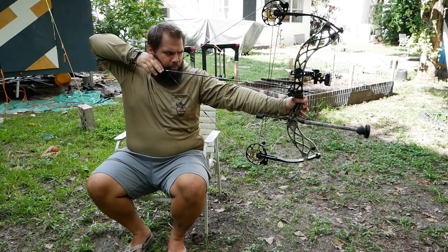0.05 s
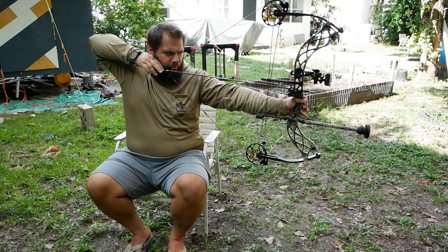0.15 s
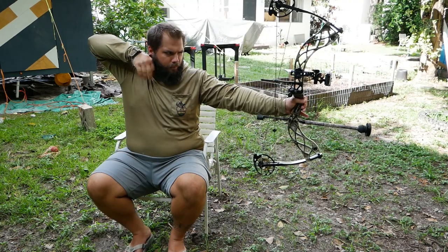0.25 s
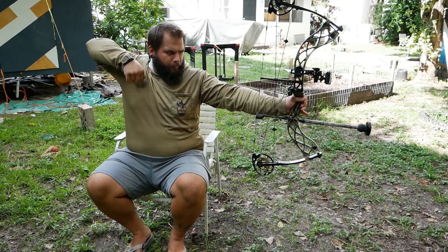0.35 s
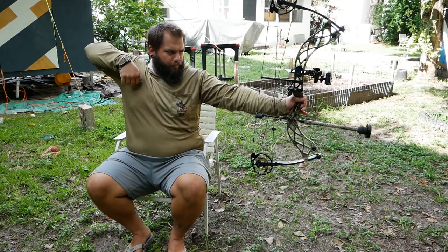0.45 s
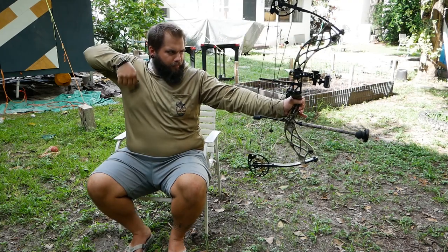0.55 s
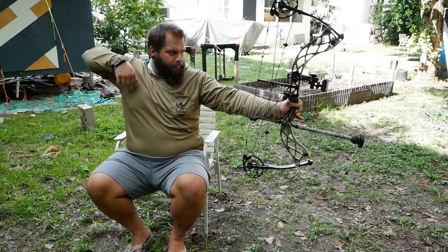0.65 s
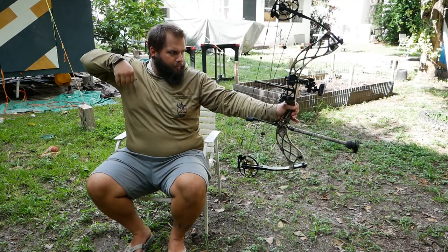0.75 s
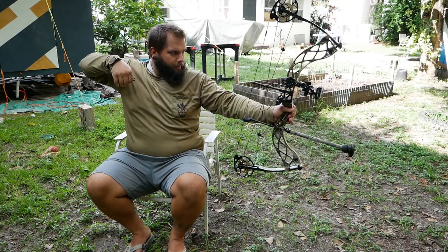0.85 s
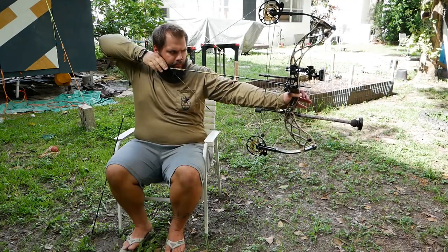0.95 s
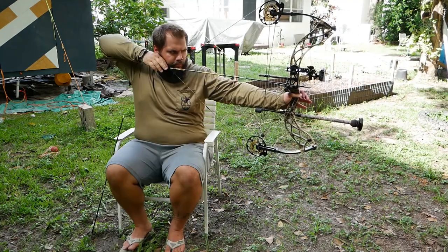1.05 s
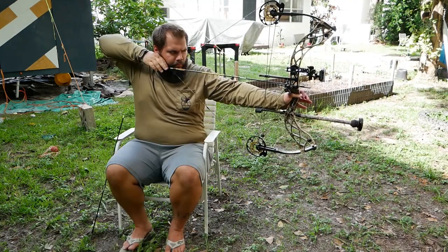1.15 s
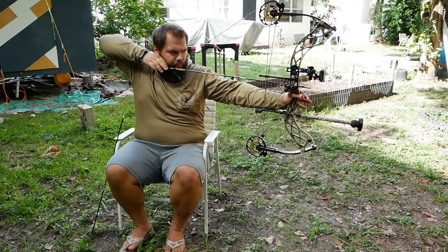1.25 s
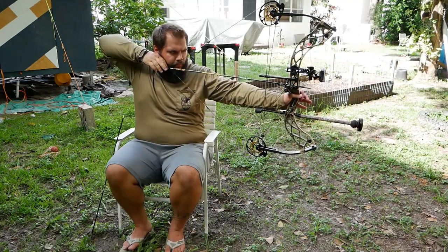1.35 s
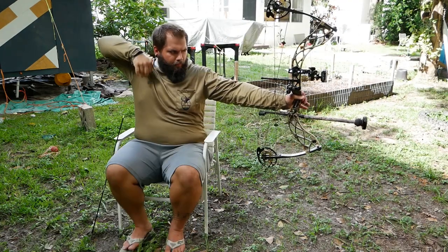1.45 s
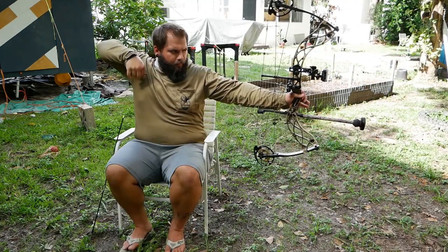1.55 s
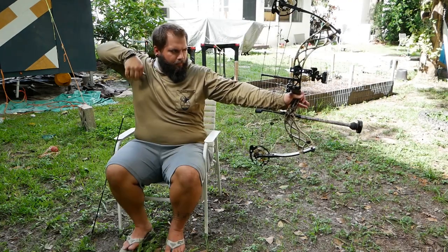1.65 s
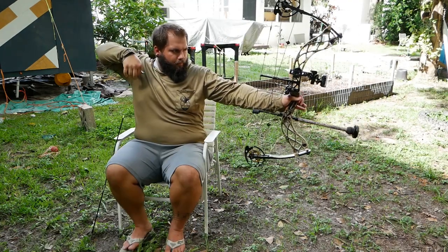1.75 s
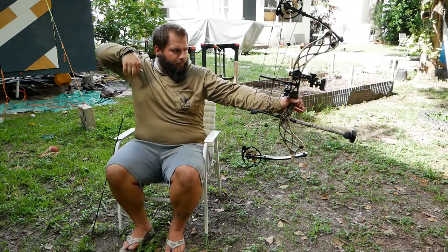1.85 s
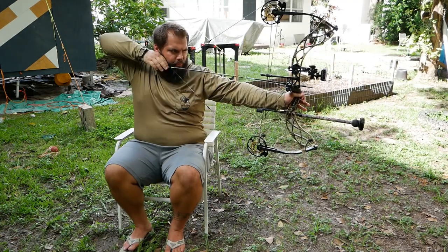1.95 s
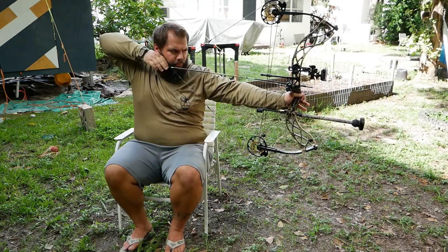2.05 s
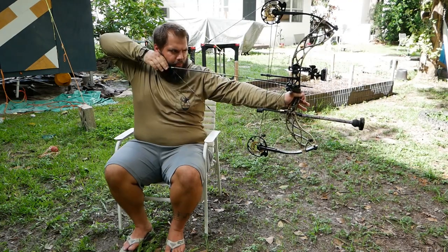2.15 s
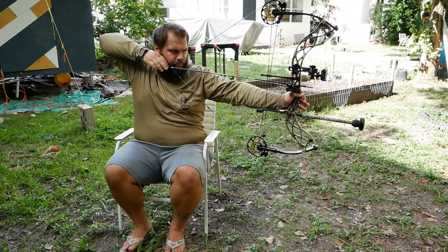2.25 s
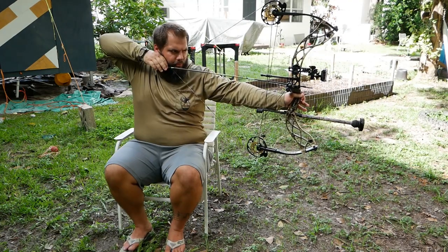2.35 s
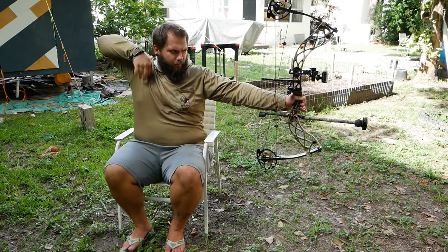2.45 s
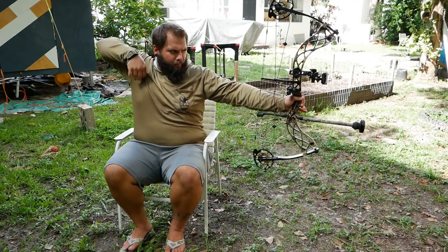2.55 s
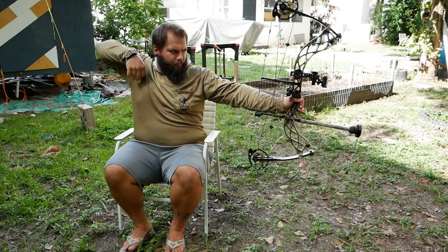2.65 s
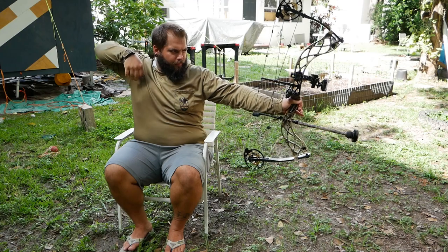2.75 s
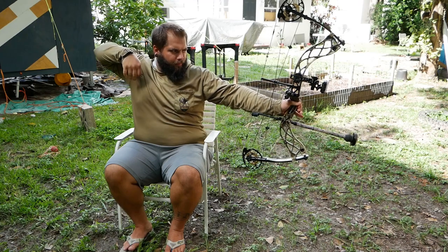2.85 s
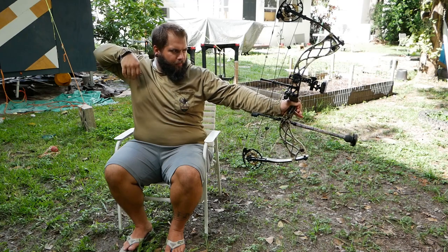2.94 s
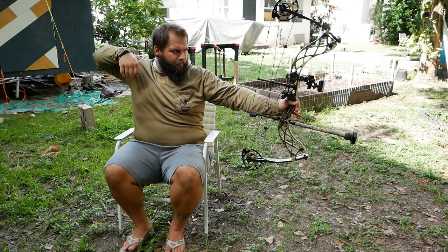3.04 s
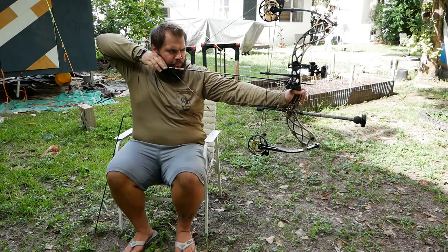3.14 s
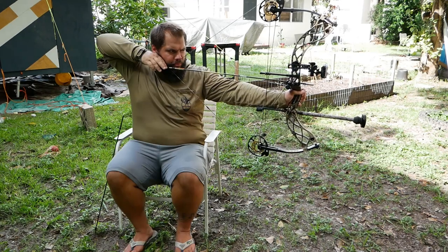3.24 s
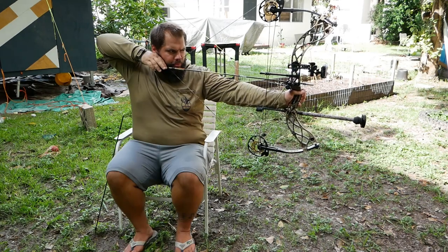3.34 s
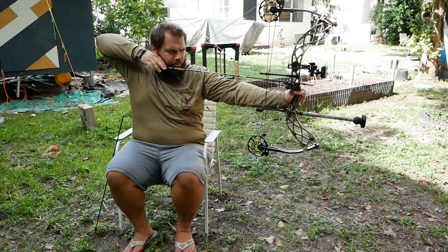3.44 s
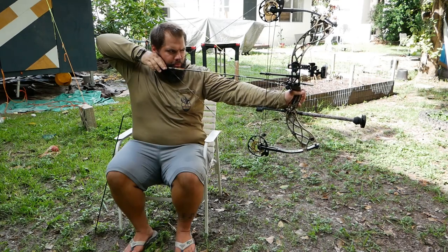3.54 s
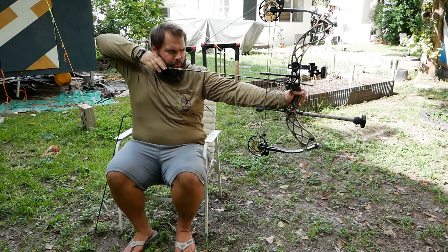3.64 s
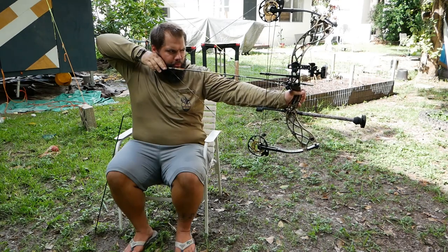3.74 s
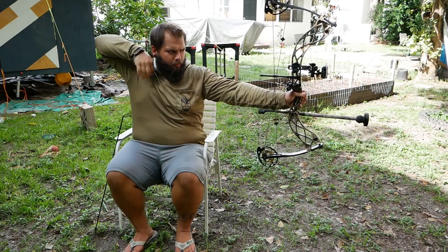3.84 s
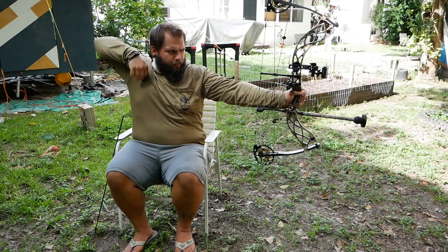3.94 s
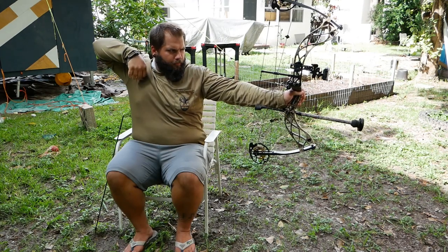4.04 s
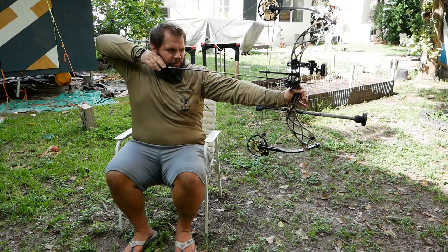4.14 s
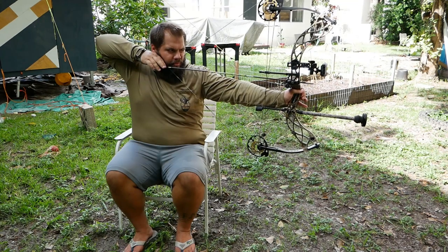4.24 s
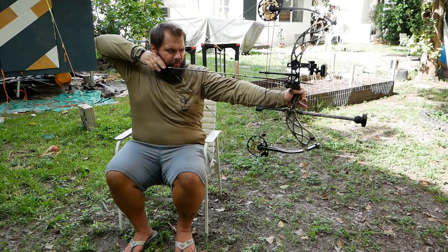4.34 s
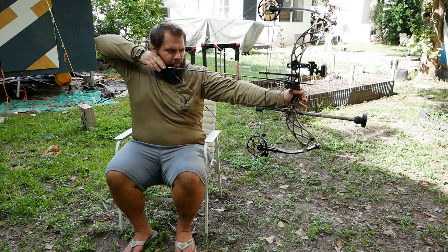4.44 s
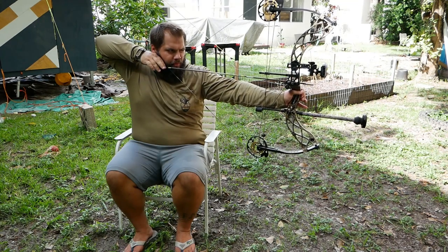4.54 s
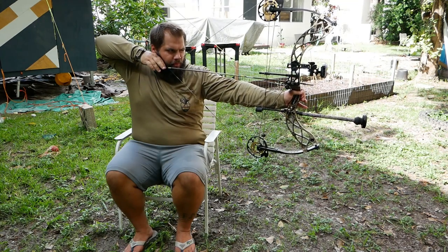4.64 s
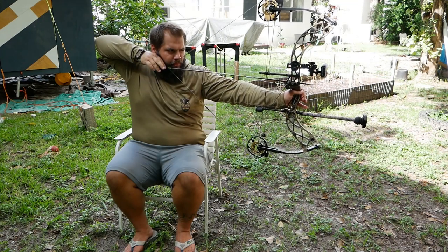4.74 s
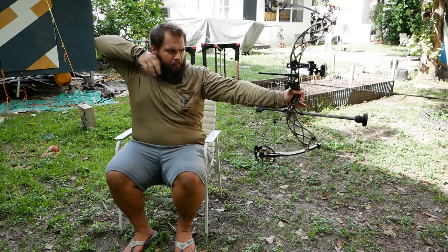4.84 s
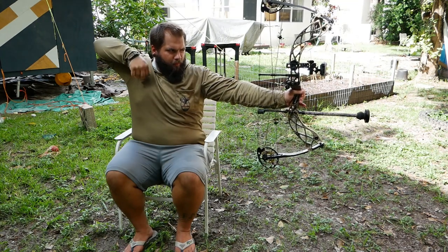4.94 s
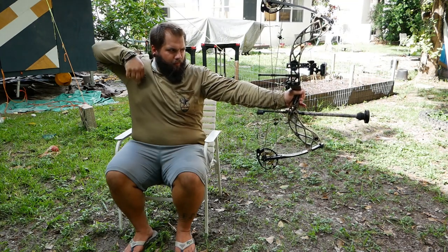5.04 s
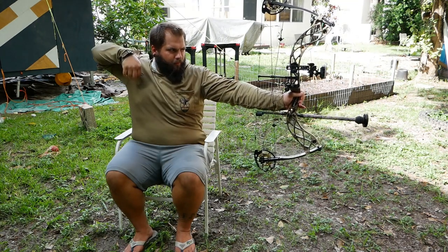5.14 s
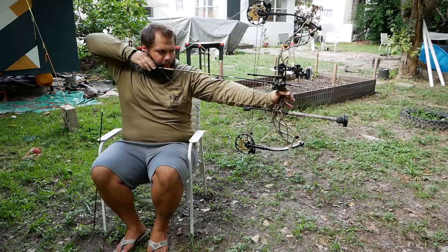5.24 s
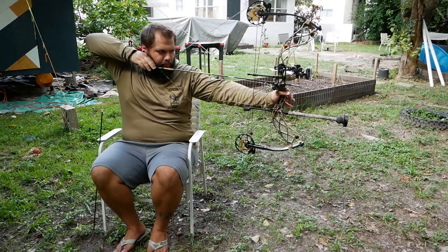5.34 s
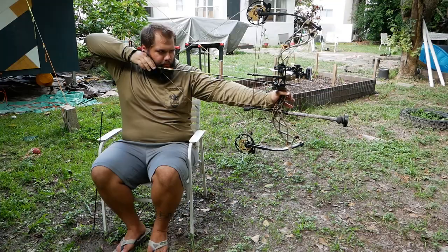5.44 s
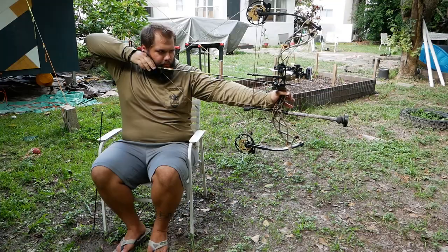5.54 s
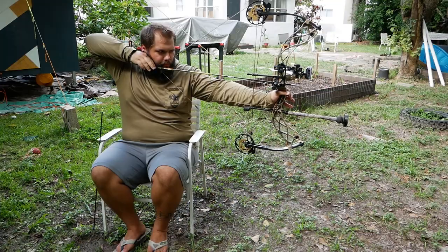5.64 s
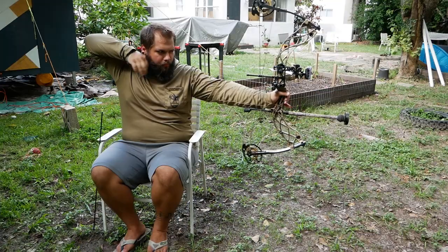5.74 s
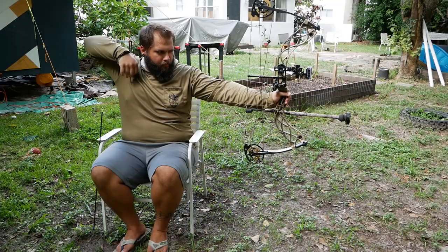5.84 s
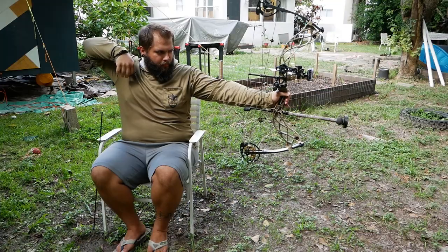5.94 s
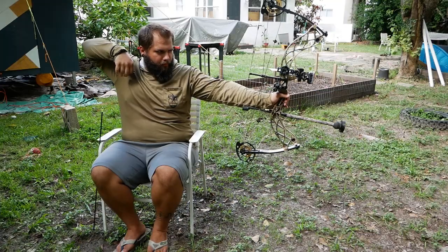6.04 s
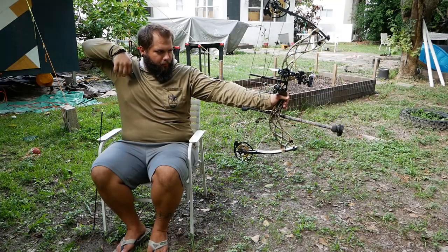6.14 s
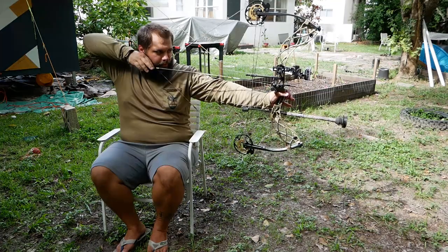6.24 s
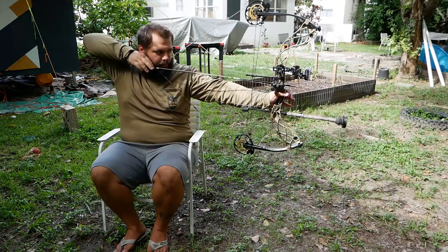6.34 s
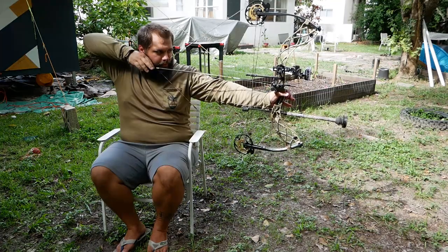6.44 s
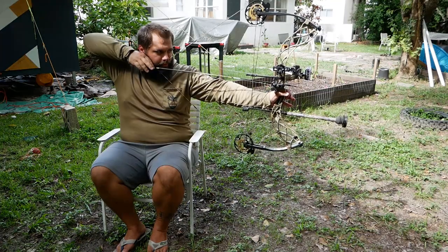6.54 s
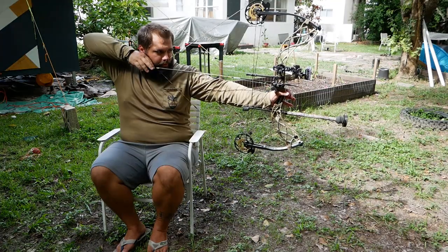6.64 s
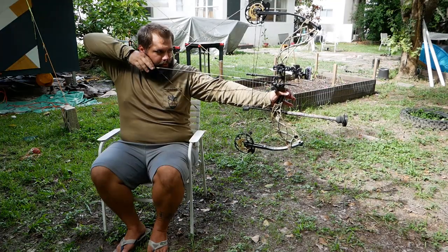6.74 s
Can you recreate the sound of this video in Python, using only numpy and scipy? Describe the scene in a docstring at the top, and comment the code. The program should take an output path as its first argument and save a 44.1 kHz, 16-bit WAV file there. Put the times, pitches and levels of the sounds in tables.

```python
"""A yard with a distant town humming: six shots of a compound bow, cut together back to back.
Each release ticks, the string tears the air with a rising whistle and the limbs buzz (noise and sines).
The arrow pops through a paper sheet and thuds into a target on the right (short pulses, then a ring).
Walls and yard throw it back as delayed copies and sparse random echoes. Thin tones whine at times, a far
dog barks on the left (resonances) and the grass ticks once. Levels in dB are relative parts of the mix."""
import sys
import numpy as np
from scipy import signal
from scipy.fft import rfft, irfft, next_fast_len
from scipy.io import wavfile
from scipy.ndimage import uniform_filter1d

SR = 44100
rng = np.random.default_rng(int(sys.argv[2]) if len(sys.argv) > 2 else 0)


def generate_wav(signal):
    """Clip the signal to [-1, 1] and save it as 16-bit WAV at the path in sys.argv[1]."""
    frames = np.transpose(np.atleast_2d(signal))
    scaled = np.clip(frames, -1, 1) * 32767
    pcm = np.round(scaled).astype(np.int16)
    wavfile.write(sys.argv[1], SR, pcm)


N = 299439  # length in samples

# the stretches between cuts: start t/s, hum level/dB, brightness/dB per octave
STRETCHES = [(0, -56, 0.87), (1.004, -49.5, 0.68), (1.973, -53, 1.13), (3.131, -58, 0.88),
             (4.176, -59.5, 0.9), (5.232, -55.5, 0.84), (6.23, -55, 0.7)]


def gain_of(db):
    """Turns decibels into a plain multiplier."""
    return 10 ** (np.asarray(db) / 20)


def evened(x):
    """Scales a signal to an average strength (rms) of 1."""
    return x / np.sqrt(np.mean(x ** 2) + 1e-20)


def read(points, hz):
    """Reads a table of (f/Hz, value) between its points, along a logarithmic pitch axis."""
    f, value = np.transpose(points)
    return np.interp(np.log(hz + 1), np.log(f + 1), value)


def colour(x, response):
    """Makes each frequency stronger or weaker: multiplies the spectrum by response(hz)."""
    size = next_fast_len(x.shape[-1] + 512)
    spectrum = rfft(x, size) * response(np.fft.rfftfreq(size, 1 / SR))
    return irfft(spectrum, size)[..., :x.shape[-1]]


def resonate(x, hz, width):
    """A resonance of gain 1: shifts the pitch hz (fixed or gliding) to zero, smooths, and shifts back."""
    turn = np.exp(2j * np.pi * np.cumsum(hz * np.ones(len(x))) / SR)
    keep = np.exp(-np.pi * width / SR)
    smooth = signal.lfilter([1 - keep], [1, -keep], x / turn)
    return 2 * (turn * smooth).real


def narrow(x, hz, width):
    """Noise through the same resonance twice, which leaves a steep peak."""
    return evened(resonate(resonate(x, hz, width), hz, width))


def shape(t, db, start, end, rise, fall):
    """Level in dB: rises at rise dB/s, holds at db from start to end, falls at fall dB/s."""
    return db - rise * np.maximum(start - t, 0) - fall * np.maximum(t - end, 0)


def wander(size, seconds):
    """Slow random drift of rms 1: noise averaged twice over the given time."""
    width = max(round(seconds * SR), 2)
    once = uniform_filter1d(rng.standard_normal(size), width)
    return evened(uniform_filter1d(once, width))


def hum():
    """Distant town: random short-time spectra with drifting patches; level and brightness jump at each cut."""
    # average colour of the hum: f/Hz, level/dB
    hum_colour = [(25, -4.5), (60, -4), (100, 5), (160, 1.5), (240, -2), (350, -3.5), (480, -4.5),
                  (1200, -10.5), (1500, -14.5), (2500, -24.5), (6000, -41), (10000, -44.5), (13000, -52.5)]
    # how alike left and right are: f/Hz, likeness (0 to 1)
    likeness = [(60, 0.67), (170, 0.88), (500, 0.22), (1420, 0.13), (4080, 0.55), (11700, 1)]
    # left minus right: f/Hz, level/dB
    lean = [(60, -4), (170, 0.5), (500, -2), (1420, -2.5), (4080, -0.5), (11700, -1)]
    hop = 128  # samples between spectra
    frames, hz = N // hop + 5, np.fft.rfftfreq(512, 1 / SR)
    a, b, c, d, patches = rng.standard_normal((frames, 257, 5)).T
    patches = uniform_filter1d(patches, 5, 0)  # smooth across frequency
    patches = evened(uniform_filter1d(patches, 24, 1))  # and across time
    start, level_db, bright_db = np.transpose(STRETCHES)

    def stretch_at(t):
        return np.clip(np.searchsorted(start, t, "right") - 1, 0, None)

    same = np.clip(read(likeness, hz), -1, 1)[:, None]
    left = a + 1j * b
    right = same * left + np.sqrt(1 - same ** 2) * (c + 1j * d)
    octaves = np.log2(hz[:, None] / 500 + .05)
    tilt_db = octaves * bright_db[stretch_at(np.arange(frames) * hop / SR)]
    spectra = np.array([left, right])
    spectra *= gain_of(read(hum_colour, hz)[:, None] + tilt_db + 0.84 * patches)
    spectra *= gain_of(np.multiply.outer([.5, -.5], read(lean, hz)))[:, :, None]
    x = evened(signal.istft(spectra, nperseg=512, noverlap=512 - hop)[1][:, :N])
    return x * gain_of(level_db[stretch_at(np.arange(N) / SR)])


def bow(tick_db, bow_db, t):
    """Release tick, rush and rising whistle of the string, then buzzing limbs and cables; t counts from release."""
    # limb and cable resonances: f/Hz, width/Hz (unused by the first two), level/dB
    # the first two are sines whose pitch varies a little at random, the others are resonant noise
    limbs = [(244.5, 40, -10.5), (416, 20, -2), (580, 240, -4), (1210, 420, -12.5), (1910, 360, -16.5),
             (2795, 370, -23)]
    # colour of the torn air: f/Hz, level/dB
    air_colour = [(200, -11), (800, 4.5), (2000, 6.5), (4000, -5), (6500, -12.5), (10000, -8.5),
                  (13000, -31)]
    stop_s, run_s = .0215, .12  # the string slams home; rush and upper buzz end
    a, b, c, d = rng.standard_normal((4, len(t)))
    detune = 1 + .04 * rng.uniform(-1, 1, 2)

    # the tick is bright noise that drops 60 dB in 0.03 s
    tick = gain_of(tick_db + 1.5 - 60 * t / 0.03) * evened(colour(a, lambda f: f / (f + 4000)))

    # air torn by the string, and by the arrow, loudest at the paper
    whip_db = shape(t, db=-14, start=.015, end=.05, rise=2000, fall=900)
    flight_db = shape(t, db=-8, start=.04, end=.052, rise=600, fall=500)
    onset_db = 2000 * np.minimum(t - .015, 0)  # the flight may not start ahead of the whip
    torn_db = np.maximum(whip_db, np.minimum(flight_db, onset_db))
    air = gain_of(torn_db) * evened(colour(b, lambda f: gain_of(read(air_colour, f))))

    # the whistle glides up with the string's speed
    whistle_hz = 1500 + (4200 - 1500) * np.minimum(t / stop_s, 1) ** 3.0
    whistle_db = shape(t, db=-4, start=.017, end=.0225, rise=4500, fall=9000)
    whistle = gain_of(whistle_db) * evened(resonate(c, whistle_hz, 470))

    def buzz_shape(time):
        return shape(time, db=1.5, start=.0245, end=.042, rise=9000, fall=3000)

    buzz_db = buzz_shape(t)
    # the lowest limb mode is already moving 4 ms earlier
    lowest_db = np.maximum(buzz_db, buzz_shape(t + .004))
    low = 0
    for (f, _, db), factor, level_db in zip(limbs, detune, (lowest_db, buzz_db)):
        sine = np.sin(2 * np.pi * f * factor * (t - stop_s - .001))
        low = low + gain_of(db + level_db) * np.sqrt(2) * sine
    high = sum(gain_of(db) * evened(resonate(d, f, width)) for f, width, db in limbs[2:])
    rush = tick + gain_of(bow_db) * (air + whistle + gain_of(buzz_db) * high) * (t < run_s)
    return rush, gain_of(bow_db) * low


def blow(pop, modes, u, deep_db):
    """A hit in both ears: a pop of air made of short pulses, then fading sines; u is the time since contact."""
    # below 3 kHz the left wave runs a little ahead: sideways sound reaches the two ports a little apart
    lead = np.array([[.00007], [0]])
    # pitch and half length share one random factor, so a pulse drawn higher is also longer
    pulses = pop * rng.uniform(0.88, 1.217, (len(pop), 1)) ** [1, 1, 0, 0]
    burst = 0
    for hz, half, left_db, right_db in pulses:
        bump = np.exp(-(u / half - 1) ** 2)  # peaks one half length after contact, so short ones peak first
        wave = np.cos(2 * np.pi * hz * (u - half + lead * (hz < 3000)))
        burst = burst + gain_of([[left_db], [right_db]]) * bump * wave

    u = np.maximum(u, 0)
    ring = 0
    for hz, t60, left_db, right_db in modes * rng.uniform(.94, 1.06, (len(modes), 1)) ** [1, 0, 0, 0]:
        level_db = np.array([[left_db], [right_db]]) - 60 * u / t60 + deep_db * (hz < 160)
        ring = ring + gain_of(level_db) * np.sin(2 * np.pi * hz * u)
    return burst + ring * (1 - np.exp(-u / .002))  # the ring swells in over about 2 ms


def bounced(x, late, db):
    """Adds the copy that comes off the ground, late seconds behind."""
    return x + gain_of(db) * np.roll(x, round(late * SR), axis=-1)


def yard():
    """Sparse random echoes, each band dying at its own speed: the yard's return and the house's answer to hits."""
    # time to fade by 60 dB: f/Hz, t/s
    fade_times = [(100, 1), (400, 0.6), (1000, 0.53), (2500, 0.53), (6000, 0.46), (11000, 0.45)]
    # three parts of the return, a row for left and one for right:
    # level/dB, full from t/s, full until t/s, rise/(dB/s), fall/(dB/s)
    near_shapes = [(-7, 0, 0.001, 100, 140), (-9, 0, .001, 100, 95)]
    house_shapes = [(-3, .084, .1, 900, 200), (-13, .066, .08, 600, 150)]
    far_shapes = [(-0.5, .26, .42, 70, 20), (3.0, .29, .42, 70, 40)]
    # colour of fence and grass: f/Hz, level/dB
    near_colour = [(200, 3), (420, -3), (750, -9), (1500, -2), (3000, 2), (8000, 3)]
    # colour of the house's answer: f/Hz, level/dB
    house_colour = [(150, -12), (300, -4), (450, 1.5), (1200, -0.5), (3000, -8), (8000, -9)]
    # one tap in every 20 samples, of random sign; the ears share a little
    at = np.arange(0, SR - 20, 20) + rng.integers(0, 20, (2, (SR - 1) // 20))
    taps = np.zeros((2, SR))
    np.put_along_axis(taps, at, rng.choice([-1., 1.], at.shape), 1)
    taps = taps + 0.21 * taps[::-1]

    hz, frame_t, spectra = signal.stft(taps, SR, nperseg=256)
    fading = spectra * gain_of(-60 * frame_t / read(fade_times, hz)[:, None])
    tail = signal.istft(fading, SR, nperseg=256)[1][:, :SR]
    lumps_db = 1.5 * wander(SR, .01)  # uneven, lumpy echo
    tail = tail * gain_of(lumps_db) / np.sqrt(0.038 * 2000)

    t = np.arange(SR) / SR
    near, house, far = (gain_of([shape(t, *side) for side in part])
                        for part in (near_shapes, house_shapes, far_shapes))
    near_return = colour(tail * near, lambda f: gain_of(read(near_colour, f)))
    house_return = colour(tail * house, lambda f: gain_of(read(house_colour, f)))
    return near_return + tail * far, house_return


def shot(release, paper, target, tail, house):
    """One shot: bow, paper and target heard directly, then off the ground, walls, house and yard."""
    # pulses of each pop, before a random spread: f/Hz, half length t/s, left level/dB, right level/dB
    sheet_pop = [(1300, .0005, -26.5, -5), (2610, .0003, -10, -6.5), (3700, 0.00021, -13.5, -13),
                 (8000, .0002, -29, -26)]
    bag_pop = [(450, .0015, -14, -24), (720, .0007, -21, -2.5), (1400, .0006, -21, -10),
               (2200, .0005, -15, -8), (3600, .0003, -20, -20), (7500, .0002, -33, -34)]
    # what rings on, pitch before a random spread: f/Hz, 60 dB fade t/s, left level/dB, right level/dB
    sheet_modes = [(560, .013, -13, -12), (1600, .008, -22, -16), (2900, .008, -19, -19)]
    bag_modes = [(118, 0.27, -46, -46), (213.2, 0.035, -16, -21), (310, .025, -22, -17),
                 (430, 0.025, -32, -12)]
    # single reflections off things close by: delay t/s, left level/dB, right level/dB
    walls = [(.0037, -26, -24), (.0065, -28, -12), (.0176, -12, -28), (.0285, -17, -30), (.074, -32, -22)]
    t = np.arange(SR // 5) / SR
    release_s, tick_db, bow_db = release
    rush, buzz = bow(tick_db, bow_db, t)
    sheet = gain_of(paper[1]) * blow(sheet_pop, sheet_modes, t - paper[0] + release_s, 0)
    bag = gain_of(target[1]) * blow(bag_pop, bag_modes, t - target[0] + release_s, target[2])
    hits = bounced(sheet, .0014, -2.5) + bounced(bag, .00147, -1)

    into_yard = rush + gain_of(-2.0) * buzz + gain_of(-3.5) * (sheet + bag)[1]
    out = signal.fftconvolve(into_yard[None], tail, axes=1)
    out[:, :len(t)] += (rush + buzz) * gain_of([[-.6], [.6]]) + hits

    def add_late(x, late, left_db, right_db):
        out[:, round(late * SR):][:, :len(t)] += x * gain_of([[left_db], [right_db]])

    # small walls return little bass
    thin = colour((gain_of(-4.0) * sheet + bag)[1], lambda f: f ** 2 / (f ** 2 + 600 ** 2))
    for late, left_db, right_db in walls:
        add_late(thin, late, left_db, right_db)
    # the house front answers in five evenly spaced slaps, each 1.5 dB softer
    for k in range(5):
        add_late(thin, .084 + k * .0064, -17 - 1.5 * k, -33 - 1.5 * k)
    into_house = gain_of(-2.5) * thin + gain_of(5.0) * bag[0]
    out += signal.fftconvolve(into_house[None], house, axes=1)

    # the far wall behind the bow returns a dull copy
    dull = colour(rush + buzz, lambda f: 1 / (1 + (f / 2500) ** 2))
    add_late(dull, .134, -14, -18)
    return out


def rustle():
    """A faint dry tick in the grass: a short puff of noise, brightened by taking sample differences."""
    # ticks: t/s, level/dB (9 dB is taken off below)
    grass_ticks = [(0.8296, -62)]
    out, t = np.zeros((2, N)), np.arange(2000) / SR
    for s, db in grass_ticks:
        bright = np.diff(rng.standard_normal(len(t) + 1))
        out[:, round(s * SR):][:, :len(t)] += gain_of(db - 9 - 60 * t / .06) * bright
    return out


def whine():
    """Thin tones that throb: sines with narrow noise around them, their level drifting at random."""
    # tones: f/Hz, level/dB
    tone_rows = [(1180, -3), (2342, 0)]
    # when they sound: from t/s, to t/s, level/dB
    spells = [(1.004, 1.55, -71), (1.973, 3.131, -73), (3.131, 3.86, -80)]
    t = np.arange(N) / SR
    level = sum(gain_of(db) * (t > start) * (t < end) for start, end, db in spells)
    level = level * gain_of(1.2 * wander(N, .03))
    tones = 0
    for hz, db in tone_rows:
        fuzz = .7 * narrow(rng.standard_normal(N), hz, 30)
        tones = tones + gain_of(db) * (np.sin(2 * np.pi * hz * t) + fuzz)
    return tones * level * gain_of([[-1.5], [2.5]])


def bark():
    """A far dog barks on the left, with a fainter second sound: two low part-steady modes and noisy ones above."""
    # the bark and the fainter second sound: t/s, level/dB
    bark_hits = [(1.232, -42), (1.41, -57)]
    # resonances of the bark: f/Hz, width/Hz, level/dB
    bark_modes = [(537.5, 78, 3), (658, 35, 1), (726, 87, -4.5), (1090, 110, -4), (1240, 150, 1.5),
                  (1400, 250, -9.5), (1600, 100, -5.5)]
    # how modes swell and die around each moment: level/dB, full from t/s, full until t/s, rise and fall/(dB/s)
    first_mode = (1.5, .008, .048, 330, 230)
    second_mode = (4.0, .01, .022, 330, 230)  # the third mode shares it
    upper_modes = (-5.5, -.03, .02, 900, 80)
    first = round((bark_hits[0][0] - .1) * SR)
    t = (first + np.arange(SR // 2)) / SR
    push, out = rng.standard_normal((2, len(t))), np.zeros((2, N))
    for k, (hz, width, db) in enumerate(bark_modes):
        scattered = 0.73 * np.array([narrow(p, hz, width) for p in push])
        steady = (k < 2) * np.sin(2 * np.pi * hz * t)
        part = (first_mode, second_mode, second_mode, upper_modes)[min(k, 3)]
        level = gain_of(db) * sum(gain_of(hit_db + shape(t - s, *part)) for s, hit_db in bark_hits)
        out[:, first:first + len(t)] += level * (scattered + steady)
    return out * gain_of([[2.5], [-5]])


def scene():
    """Lays the six shots over the background; each shot's echoes stop at the next cut."""
    # one row a shot: release t/s, tick level/dB (1.5 dB is added in bow), bow level/dB
    releases = [(0.3039, -40.5, -29.5), (1.4532, -40, -26), (2.4475, -43, -28), (3.8632, -43.5, -30.5),
                (4.905, -44.5, -31), (5.7923, -45.5, -30.5)]
    # arrow through the paper: t/s, level/dB
    paper_hits = [(0.3455, -12), (1.4944, -4), (2.4900, -2.5), (3.9064, -10), (4.9460, -10), (5.835, -5.5)]
    # arrow into the target: t/s, level/dB, extra deep thump level/dB
    target_hits = [(0.3591, -5.5, 0), (1.5075, -4, 7), (2.5041, -4.5, 3), (3.9203, -4.5, -1),
                   (4.9608, -6, -9), (5.8487, -5, 7)]
    mix = hum() + whine() + bark() + rustle()
    cuts = np.array([row[0] for row in STRETCHES] + [N / SR])
    for release, paper, target in zip(releases, paper_hits, target_hits):
        end = round(cuts[cuts > release[0]][0] * SR)
        part = mix[:, round(release[0] * SR):end]
        tail, house = yard()
        part += shot(release, paper, target, tail, house)[:, :part.shape[1]]
    return mix


def record(dry):
    """The microphone cuts bass and has a treble notch, the input rounds off peaks; then the top is cut off."""
    # microphone response: f/Hz, level/dB
    mic_response = [(20, -20), (60, -16.5), (150, -2), (300, 0), (7000, -0.5), (7950, -9), (9000, -2.5),
                    (11200, -1.5), (12400, -15.5)]
    edge_hz, ceiling = 12400, .62
    miked = colour(dry, lambda f: gain_of(read(mic_response, f)))
    rounded = ceiling * np.tanh(miked / ceiling)
    low_pass = signal.firwin(511, edge_hz, window=("kaiser", 9), fs=SR)
    return signal.oaconvolve(rounded, low_pass[None], "same")


dry = scene()
out = record(dry)
generate_wav(out)
```